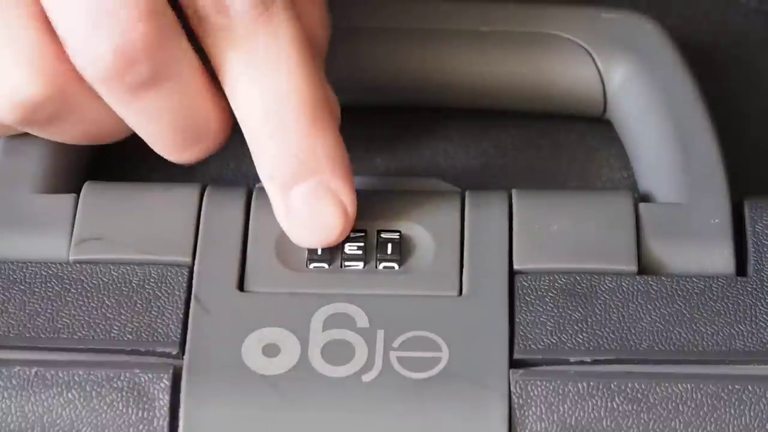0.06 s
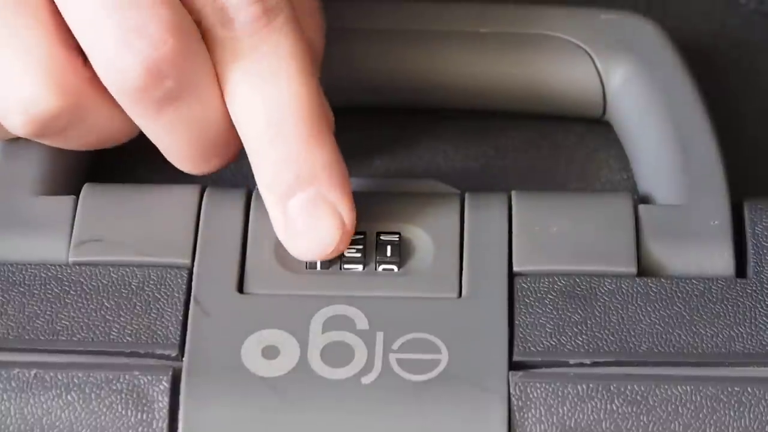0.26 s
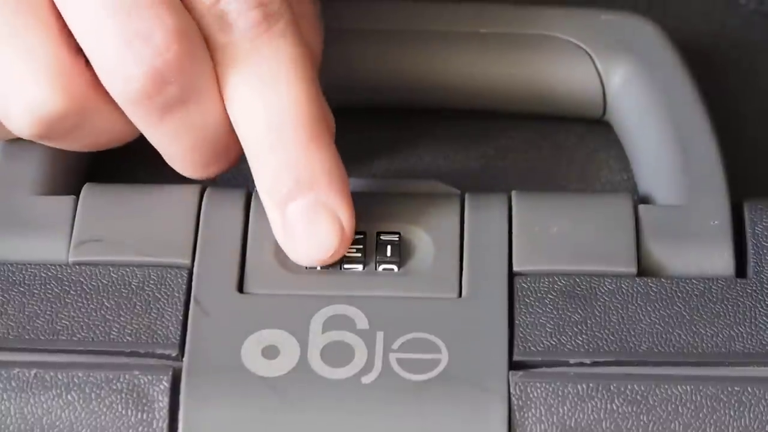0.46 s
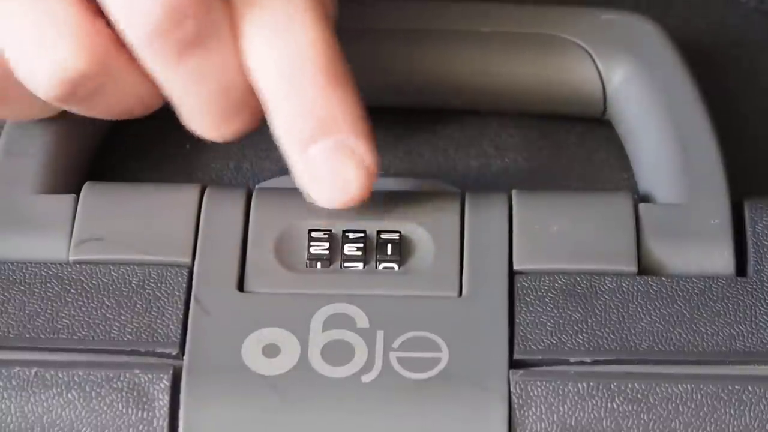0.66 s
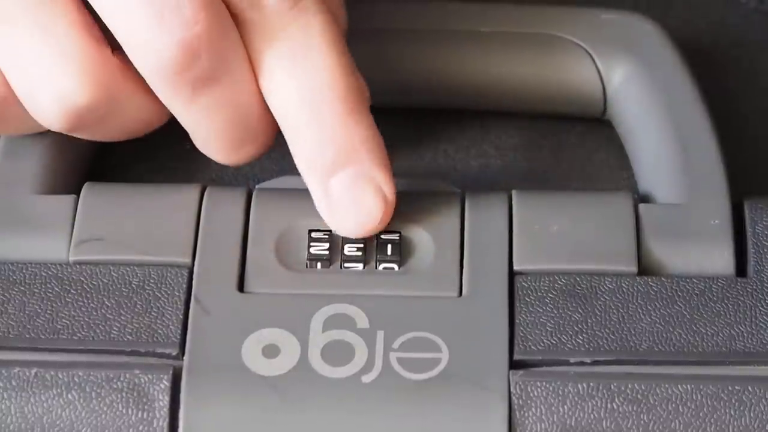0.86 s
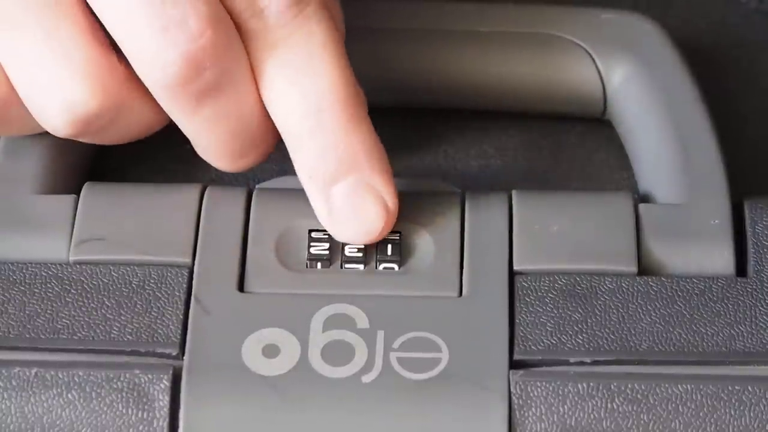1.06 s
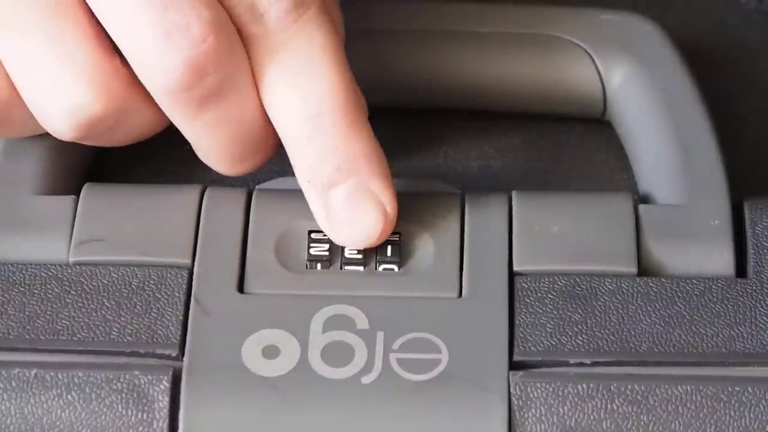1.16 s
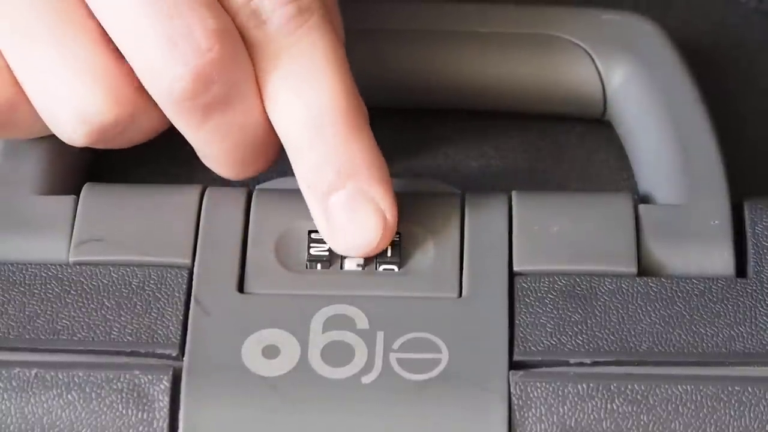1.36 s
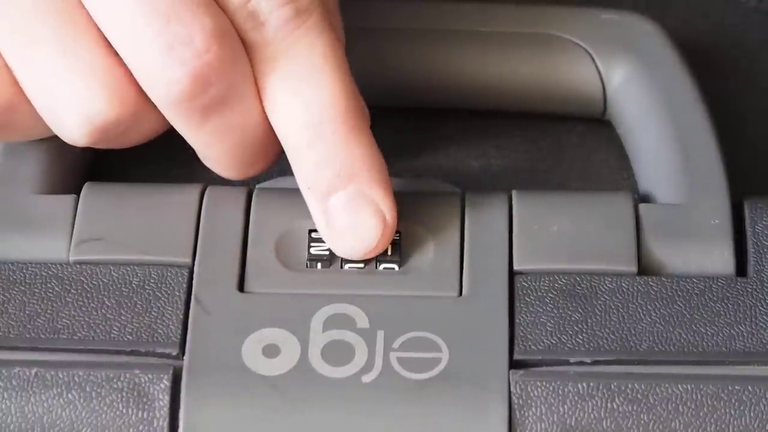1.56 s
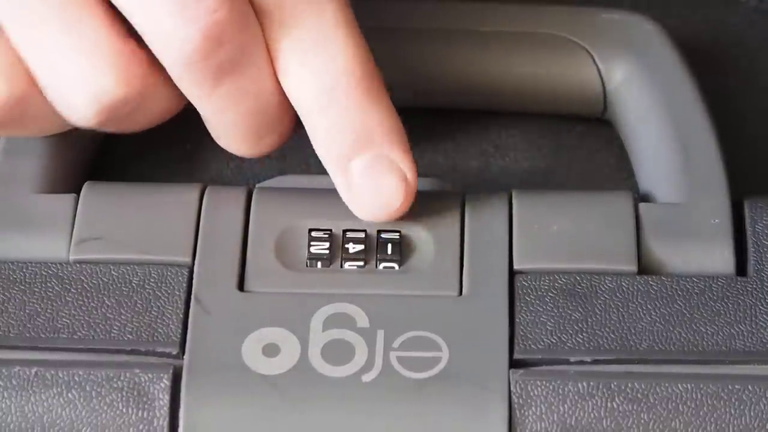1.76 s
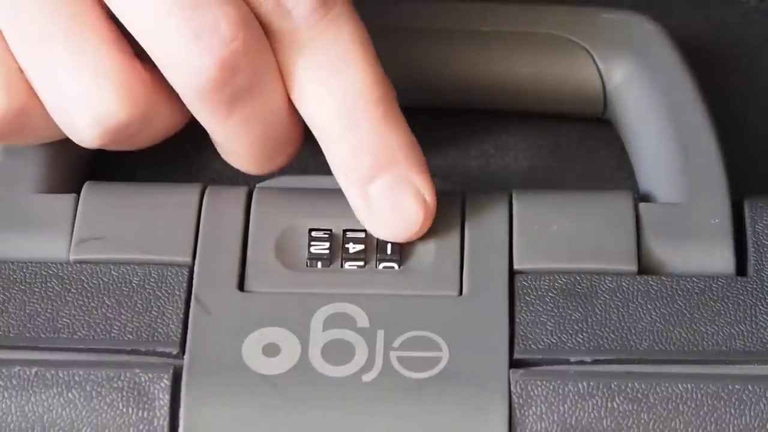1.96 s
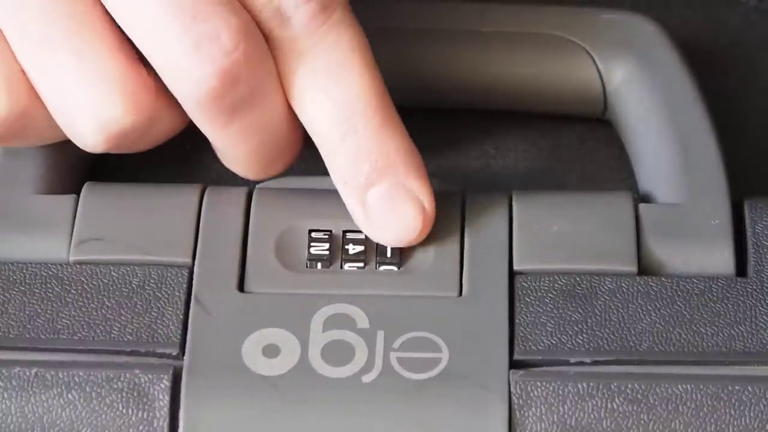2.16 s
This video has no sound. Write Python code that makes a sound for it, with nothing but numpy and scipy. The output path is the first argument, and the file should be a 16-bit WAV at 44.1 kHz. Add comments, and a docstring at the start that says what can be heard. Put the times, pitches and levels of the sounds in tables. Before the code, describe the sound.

A suitcase lock's number wheel gives two small sharp plastic clicks at about 0.2 and 0.3 seconds, each with a slight hollow thump. A fingertip rubs faintly throughout and softly nudges the case between 1.2 and 1.7 seconds. A tiny high squeak leads into a third, duller click near 1.4 seconds, and a faint tick follows at 1.6. The sound is close, in a quiet room.

```python
"""A fingertip rubs softly in a quiet room, then a number wheel of a suitcase lock snaps in twice.
At each snap the detent spring strikes and rebounds: the plastic housing rings briefly, a short tail
of noise dies away, the hollow case thumps and the room answers. The finger goes on rubbing and
nudging the case, and one wheel squeaks just before it drops into its notch with a third snap."""
import sys
import numpy as np
from scipy import signal
from scipy.fft import rfft, irfft
from scipy.io import wavfile
from scipy.ndimage import uniform_filter1d

SR = 44100
rng = np.random.default_rng(int(sys.argv[2]) if len(sys.argv) > 2 else 0)


def master_out(mix):
    """Clip the mix to full scale and print it as 16-bit PCM to the path in sys.argv[1]."""
    frames = np.transpose(np.atleast_2d(mix))
    ceiling = np.clip(frames, -1, 1)
    pcm = np.round(ceiling * 32767).astype(np.int16)
    wavfile.write(sys.argv[1], SR, pcm)


N = 97020

# Colour of the room tone (frequency [Hz], relative level [dB])
ROOM_TONE_COLOUR = [(20, -8), (45, 0), (95, 2.5), (200, -8.5), (275, -12.5), (400, -7), (490, -12),
                    (600, -10), (850, -14.5), (1020, -10.5), (1280, -27.5), (1580, -12), (1900, -15.5),
                    (3300, -18.5), (3720, -16), (4400, -22), (6500, -26.5), (7700, -27.5), (8400, -23.5),
                    (9800, -26), (16000, -27.5)]
# Likeness of left and right in the noise layers (frequency [Hz], coherence [0-1])
STEREO_COHERENCE = [(30, 0.95), (130, 0.92), (300, 0.66), (700, 0.54), (1500, 0.24), (4000, 0.083),
                    (12000, 0.017)]
# Early reflections (left delay [s], right delay [s], level [dB])
REFLECTIONS = [(.0068, .0068, -19), (.0075, .0074, -18)]
# Decay of the reverb tail (frequency [Hz], t60 [s])
REVERB_DECAY = [(100, 0.3), (600, 0.2), (2000, 0.31), (5000, 0.32), (9000, 0.2), (15000, 0.091)]
# Colour of the reverb (frequency [Hz], relative level [dB])
REVERB_COLOUR = [(100, -7), (700, 7.5), (1650, 0), (2200, 2.5), (3400, -2.5), (5000, -6), (7200, -4),
                 (9600, 7.5), (15500, -0.5)]
# Modes of the hollow case (frequency [Hz], level [dB], t60 [s])
CASE_MODES = [(91.5, -12.5, 0.077), (147, -7, 0.059), (235, -3.5, 0.049), (377, -1, 0.025),
              (597, -2.5, 0.026)]
# Swell of the finger's rubbing (time [s], level [dB])
RUB_ENVELOPE = [(0, -57), (.06, -60), (.14, -55), (.25, -54.5), (.42, -57), (.52, -58.5), (.75, -57),
                (.9, -58.5), (1.03, -53.5), (1.19, -52), (1.27, -51.5), (1.42, -52.5), (1.53, -55.5),
                (1.62, -50), (1.76, -54), (1.86, -56.5), (1.94, -54), (2.02, -59), (2.2, -59)]
# Colour of the rubbing through the case (frequency [Hz], relative level [dB])
RUB_SPECTRUM = [(25, -18), (70, -1.5), (110, 0.5), (170, -2.5), (280, -15), (700, -15.5), (1300, -22),
                (4000, -41), (16000, -59)]
# Soft pushes of the fingertip on the case (time [s], level [dB])
FINGER_NUDGES = [(.352, -44), (1.184, -41), (1.313, -34.5), (1.326, -37), (1.406, -37.5), (1.421, -35.5),
                 (1.588, -36.5), (1.608, -35.5), (1.634, -37), (1.693, -39)]
# Path of the wheel's squeak (time [s], pitch [Hz], fundamental [dB], octave [dB])
SQUEAK_PATH = [(1.330, 4700, -70, -73), (1.334, 4400, -55, -68), (1.341, 3825, -72, -64),
               (1.349, 3860, -60, -75), (1.356, 3880, -60, -51), (1.360, 3570, -46.5, -61),
               (1.367, 3560, -59.5, -78), (1.373, 3680, -64, -75), (1.379, 3730, -50, -66)]
# Colour of the short noise tail after each blow (frequency [Hz], relative level [dB])
NOISE_TAIL_SPECTRUM = [(150, -35), (600, 4.5), (1300, -5), (2400, 4.5), (4800, -2.5), (6300, -11),
                       (9000, -1.5), (11000, -20), (16000, -16)]
# Modes of the lock housing (frequency [Hz], level [dB], t60 [s], right minus left [dB])
HOUSING_MODES = [(1015, -14.5, 0.016, 1), (1775, 0, 0.0094, 1), (2123, -2, 0.01, 2.5),
                 (3055, -14.5, 0.016, 2), (3426, -3.5, 0.011, -1.5), (4270, -18, 0.025, -3),
                 (4890, -7, 0.009, 1), (6250, -10.5, 0.0026, -4), (7240, -12, 0.0081, 0),
                 (8430, -14.5, 0.0056, 14), (9440, -18, 0.0062, 5), (10800, -25, 0.005, 18),
                 (15545, -24, .0049, -4)]
# EQ points of a blow: knock, two neutral, two ping, two edge, treble (frequency [Hz])
BLOW_EQ_HZ = (1000, 1700, 2250, 3100, 3550, 4300, 5200, 7000)
# Blows of the detent spring, in pairs of strike and rebound (time [s], level [dB],
# knock near 1 kHz [dB], ping near 3.4 kHz [dB], edge near 5 kHz [dB], treble [dB], case thump [dB])
DETENT_BLOWS = [(.20962, -22, -4, 4.5, -11, 4.5, -46), (.21066, -27, -5, -10, -6, 4, -58),
                (.31479, -26, -4, 2, 7.5, 4, -43), (.31607, -26, 5, -8, -8, -12, -36),
                (1.37934, -25.5, 3, -13, -8, -18, -44), (1.38005, -38, 5, -1, -2, -17, -37)]
# Faint touches of the wheels
# (time [s], level [dB], knock [dB], ping [dB], edge [dB], treble [dB], case thump [dB])
WHEEL_TOUCHES = [(.1675, -55, 0, 0, 0, 0, -68), (.5355, -55, 0, 2, 4, 4, -70),
                 (1.6178, -46, -3, -15, -4, -6, -56), (1.61894, -49, -3, -15, -6, -10, -62)]


def amp(db):
    """Decibels to gain."""
    return 10 ** (np.asarray(db) / 20)


def unit(x):
    """Scales to rms 1."""
    return x / np.sqrt(np.mean(x ** 2) + 1e-20)


def curve_at(points, hz):
    """Reads a table on a log-frequency axis."""
    point_hz, value = np.transpose(points)
    return np.interp(np.log(hz + 1), np.log(point_hz + 1), value)


def add(mix, start_s, sound):
    """Mixes a sound in at its start time."""
    part = mix[:, max(round(start_s * SR), 0):][:, :sound.shape[-1]]
    part += sound[..., :part.shape[1]]


def pass_filter(x, kind, hz, order=2):
    """A gentle low-pass or high-pass."""
    return signal.sosfilt(signal.butter(order, hz, kind, fs=SR, output="sos"), x)


def noise(colour, size=N):
    """Stereo noise of a given colour at rms 1, nearly mono in the bass and wide on top."""
    hz = np.fft.rfftfreq(size, 1 / SR)
    shared, left, right = rfft(rng.standard_normal((3, size)))
    coherence = curve_at(STEREO_COHERENCE, hz)
    spectrum = np.sqrt(coherence) * shared + np.sqrt(1 - coherence) * np.array([left, right])
    return unit(irfft(spectrum * amp(curve_at(colour, hz)), size))


def room_tone(level_db=-56):
    """The bed: a steady low rumble with a faint hiss."""
    return amp(level_db) * noise(ROOM_TONE_COLOUR)


def room_reverb(x, tail_db=-10.5, scatter_db=-12.5, scatter_t60_s=0.14, predelay_s=0.0062):
    """What the room returns: two near reflections, quick scatter off the furniture and a short tail."""
    size = SR // 2
    hz, t, spectrum = signal.stft(rng.standard_normal((2, size)), SR, nperseg=256)
    colour = amp(curve_at(REVERB_COLOUR, hz))[:, None]
    decay = amp(-60 * t / curve_at(REVERB_DECAY, hz)[:, None])
    tail = signal.istft(spectrum * colour * decay, SR, nperseg=256)[1][:, :size]
    scatter = noise(REVERB_COLOUR, size) * amp(-60 * np.arange(size) / SR / scatter_t60_s)
    diffuse = amp(tail_db) * unit(tail) + amp(scatter_db) * unit(scatter)
    response = np.zeros((2, size))
    add(response, predelay_s, diffuse / np.sqrt(size))
    for left_s, right_s, db in REFLECTIONS:
        response[0, round(left_s * SR)] += amp(db)
        response[1, round(right_s * SR)] += amp(db)
    return signal.fftconvolve(x, response, axes=1)[:, :N]


def case_thump():
    """The hollow case pushed once; it cannot radiate the deepest bass."""
    t = np.arange(SR // 4) / SR
    ring = -sum(amp(db - 60 * t / t60) * np.sin(2 * np.pi * hz * t) for hz, db, t60 in CASE_MODES)
    return pass_filter(ring, "high", hz=55)


def finger():
    """Dull rubbing and soft nudges, heard through the case."""
    rub_db = np.interp(np.arange(N) / SR, *np.transpose(RUB_ENVELOPE))
    out = amp(rub_db) * noise(RUB_SPECTRUM)
    nudge = pass_filter(case_thump(), "low", hz=185)
    for start_s, db in FINGER_NUDGES:
        add(out, start_s, amp(db) * nudge)
    return out


def wheel_squeak(pitch_jitter=0.025, flutter_db=2.5):
    """The wheel sticks and slips: a thin, falling, scratchy tone with its octave."""
    t = np.arange(N) / SR
    times, hz, fundamental_db, octave_db = np.transpose(SQUEAK_PATH)
    waver, flutter = unit(uniform_filter1d(rng.standard_normal((2, N)), size=40, axis=1))
    pitch_hz = np.interp(t, times, hz) * (1 + pitch_jitter * waver)
    phase = 2 * np.pi * np.cumsum(pitch_hz) / SR
    fundamental = amp(np.interp(t, times, fundamental_db)) * np.sin(phase)
    octave = amp(np.interp(t, times, octave_db)) * np.sin(2 * phase)
    gate = (t > times[0]) & (t < times[-1])
    return (fundamental + octave) * amp(flutter_db * flutter) * gate


def noise_tail(t, edge_db, treble_db, base_db=-20.5, rise_s=0.0018, t60_s=0.14, shelf_hz=6000):
    """Broadband noise dies away after a blow: louder if it is hard-edged, brighter if it is bright."""
    colour = [(hz, db + 0.48 * treble_db / (1 + (shelf_hz / hz) ** 4))
              for hz, db in NOISE_TAIL_SPECTRUM]
    attack = 1 - np.exp(-t / rise_s)
    return noise(colour, len(t)) * attack * amp(base_db + 0.71 * edge_db - 60 * t / t60_s)


def crack(t, treble_db, base_db=-16, decay_s=0.0017):
    """The tiny burst of noise at the front of a blow."""
    grit = pass_filter(rng.standard_normal(len(t)), "low", hz=9500)
    return amp(base_db + treble_db / 2) * np.exp(-t / decay_s) * grit


def housing_ring(t, knock_db, ping_db, edge_db, treble_db):
    """The plastic housing rings, its modes weighted by where the blow lands."""
    eq = list(zip(BLOW_EQ_HZ, (knock_db, 0, 0, ping_db, ping_db, edge_db, edge_db, treble_db)))
    out = np.zeros((2, len(t)))
    for k, (hz, db, t60, pan_db) in enumerate(HOUSING_MODES):
        envelope = amp(db + curve_at(eq, hz) - 60 * t / t60)
        pan = amp([[-pan_db / 2], [pan_db / 2]])
        out += (-1) ** k * pan * envelope * np.sin(2 * np.pi * hz * t)  # alternating polarity
    return out


def blow(level_db, knock_db, ping_db, edge_db, treble_db, contact_s=0.00024):
    """One hit inside the lock: crack, noise tail and ring, the attack softened by the brief contact."""
    t = np.arange(SR // 4) / SR
    grit = crack(t, treble_db) + noise_tail(t, edge_db, treble_db)
    ring = housing_ring(t, knock_db, ping_db, edge_db, treble_db)
    attack = 1 - np.exp(-t / contact_s)
    return amp(level_db) * attack * (grit + ring)


def wheels(case_lag_s=0.002445):
    """All snaps and touches of the wheels; the heavier case follows a moment later."""
    out = np.zeros((2, N))
    for start_s, *level_and_eq, thump_db in DETENT_BLOWS + WHEEL_TOUCHES:
        add(out, start_s, blow(*level_and_eq))
        add(out, start_s + case_lag_s, amp(thump_db) * case_thump())
    return out


def scene():
    """The lock and its reverb up front, over the dry finger and the room tone."""
    lock = wheels() + wheel_squeak()
    return lock + room_reverb(lock) + finger() + room_tone()


def record(dry):
    """Master EQ: a gentle bass roll-off and a steep cut of the very top."""
    trimmed = pass_filter(dry, "high", hz=51, order=1)
    top_cut = signal.firwin(511, cutoff=15950, window=("kaiser", 9), fs=SR)
    return signal.oaconvolve(trimmed, top_cut[None], "same")


dry = scene()
out = record(dry)
master_out(out)
```